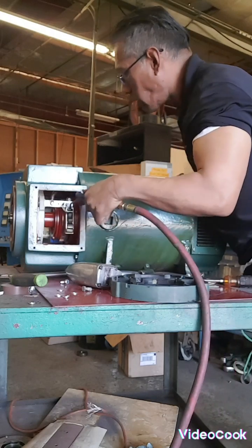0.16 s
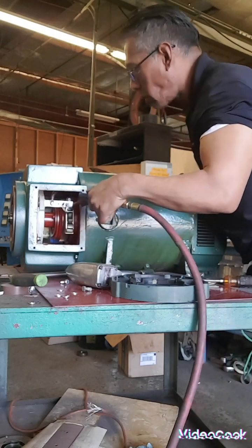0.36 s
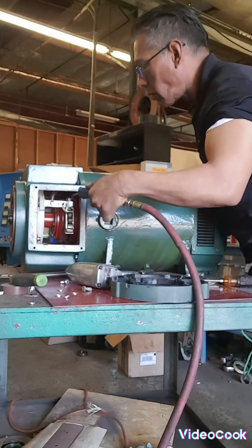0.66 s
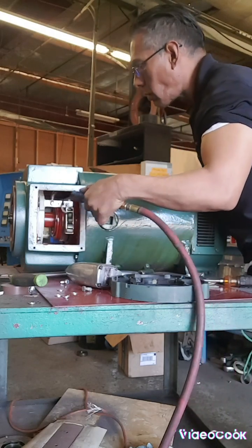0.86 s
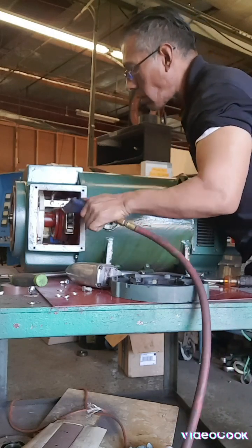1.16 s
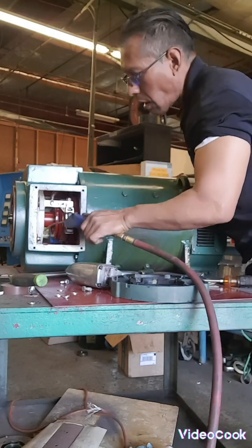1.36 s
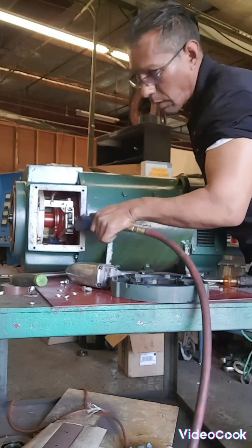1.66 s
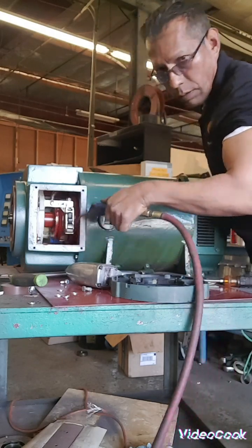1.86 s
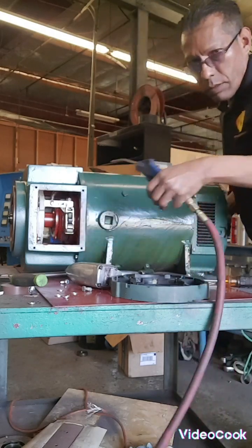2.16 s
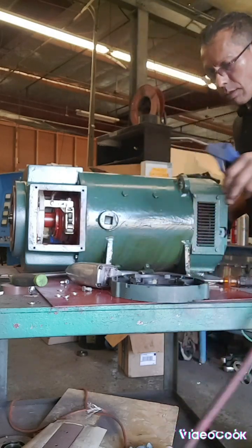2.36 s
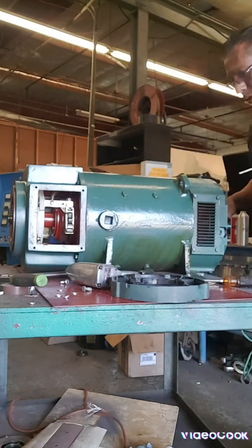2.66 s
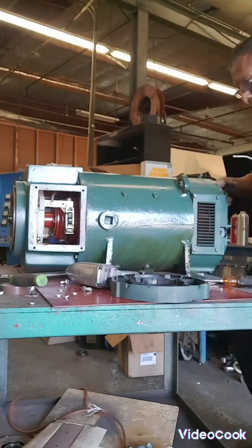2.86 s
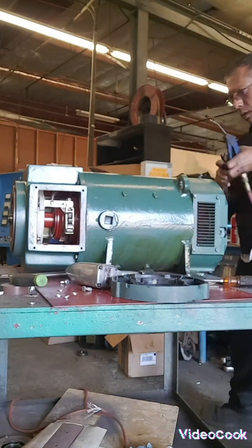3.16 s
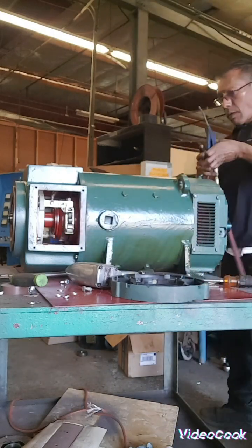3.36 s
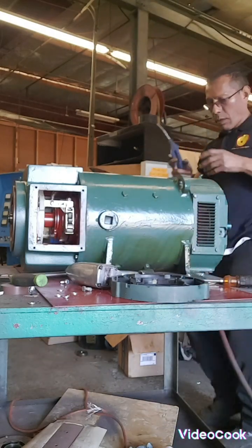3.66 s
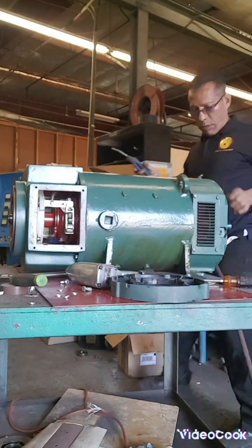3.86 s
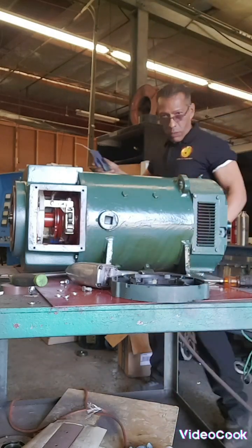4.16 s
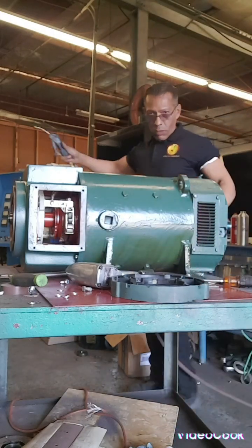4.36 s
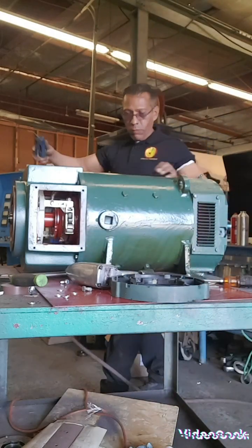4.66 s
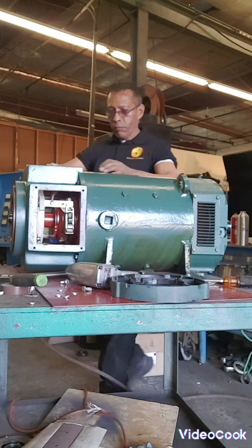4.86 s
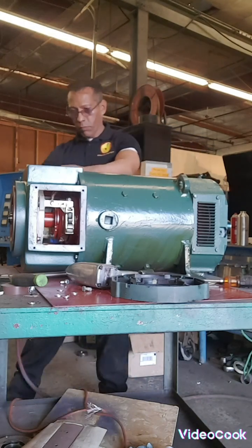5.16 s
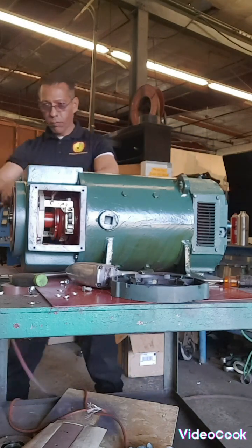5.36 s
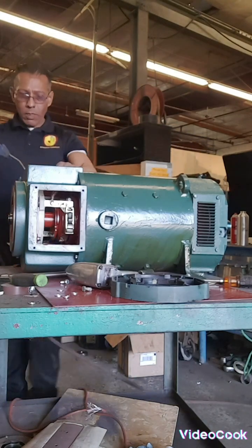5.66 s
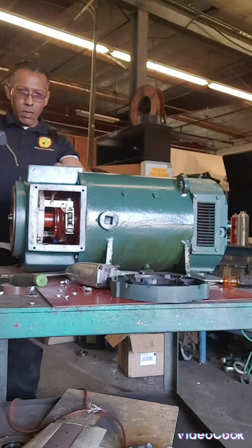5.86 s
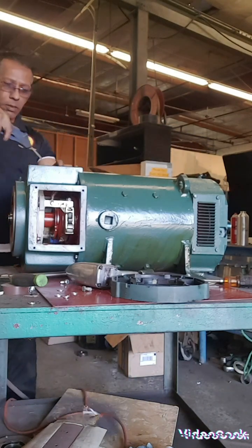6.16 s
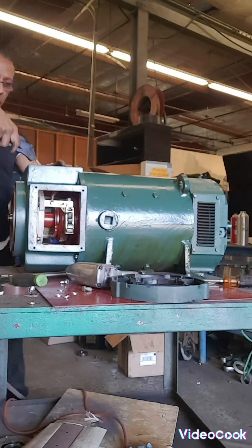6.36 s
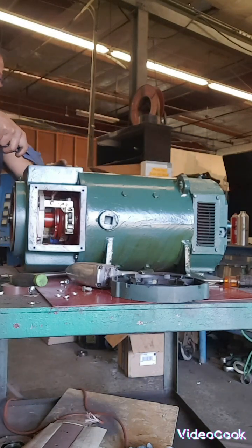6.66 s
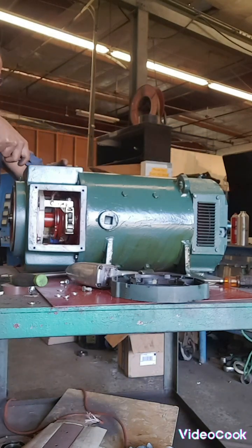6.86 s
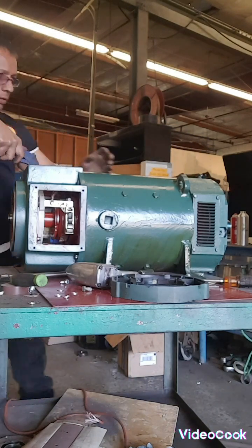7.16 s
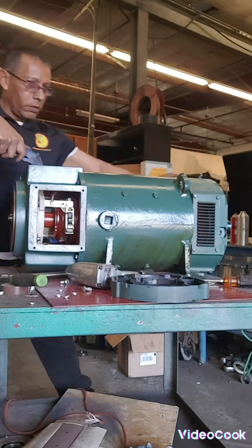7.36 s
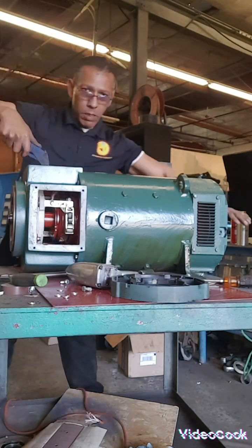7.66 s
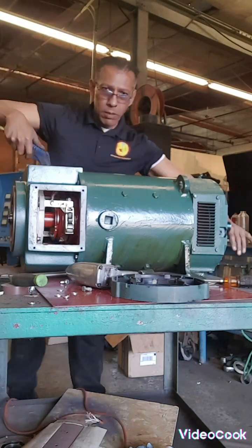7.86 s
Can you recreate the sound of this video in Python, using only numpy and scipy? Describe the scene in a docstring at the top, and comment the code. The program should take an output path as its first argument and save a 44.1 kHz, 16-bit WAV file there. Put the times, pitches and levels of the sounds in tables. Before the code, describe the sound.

Two long blasts of compressed air hiss against a metal motor in a workshop, with low puffs, a briefly chattering valve and an electrical hum.

```python
"""An air blow gun cleans a large electric motor in a repair hall, in two long bursts and a few faint spits of air.
The jet hisses, splashes on the casing and sounds its cavities; deflected air puffs over the microphone.
During the second burst something in the air line, probably a valve, chatters. A machine hums in the hall."""
import sys
import numpy as np
from scipy import signal
from scipy.fft import rfft, irfft, next_fast_len
from scipy.io import wavfile
from scipy.ndimage import uniform_filter1d, map_coordinates

SR = 44100
rng = np.random.default_rng(int(sys.argv[2]) if len(sys.argv) > 2 else 0)


def master_out(mix):
    """Clip the mix to full scale and print it as 16-bit PCM to the path in sys.argv[1]."""
    frames = np.transpose(np.atleast_2d(mix))
    ceiling = np.clip(frames, -1, 1)
    pcm = np.round(ceiling * 32767).astype(np.int16)
    wavfile.write(sys.argv[1], SR, pcm)


N = 352800

# the valve's strength: (s, level dB)
CHATTER = [(4.21, -26), (4.28, -20.5), (4.42, -20.5), (4.55, -21.5), (4.98, -20.5), (5.12, -28.5), (6.36, -30.5)]
VALVE_OPENS, VALVE_RESTS = 4.217, 6.36  # (s)  # fixed
# gusts over the microphone: (s, level dB, length s, flutter trim dB)
PUFFS = [(0.081, -22.5, .02, -10), (0.162, -17, 0.035, -1), (0.353, -31, 0.021, 1), (0.541, -30, 0.024, 12),
         (0.576, -26, 0.044, 3.5), (0.629, -22.5, 0.048, -1.5), (0.745, -26.5, 0.054, 7), (0.806, -22.5, 0.04, 2),
         (0.852, -21.5, 0.045, 0.5), (0.945, -19.5, 0.016, -3), (1.163, -25.5, 0.036, -3), (1.935, -24, 0.042, 3),
         (5.89, -24, 0.029, -12), (6.621, -29, 0.081, 9), (6.728, -23.5, 0.048, 0), (6.85, -27.5, 0.025, 1.5),
         (7.028, -32.5, .035, 10), (7.075, -26, 0.021, 4)]
# brief spits of air as the gun and hose are handled: (s, level dB, length s)
SPITS = [(2.327, -47, 0.13), (2.387, -55, 0.095), (2.555, -55, .02), (2.705, -52.5, 0.09), (2.953, -50, 0.063),
         (3.31, -56, .05), (3.507, -46.5, .05), (3.535, -38.5, 0.15), (4.123, -46.5, 0.099)]
# shoes scuff the floor: (s, level dB, length s)
SCUFFS = [(2.676, -53, .026), (3.344, -43, 0.058)]
# (Hz, dB per Hz)
FIZZ = [(7000, -21), (9600, -17), (10600, -10), (12400, -0.5), (14000, -2), (15200, 4.5), (16000, -17)]
HISS = [(1500, -9), (3000, -6.5), (4400, -1.5), (5600, 0), (7000, -1.5), (8100, 1), (8900, -5), (9600, -10), (10800, -10), (14000, -12)]
SPLASH = [(300, -20), (750, -6), (1100, -.5), (1700, 0), (2500, -2.5), (3200, -4.5), (4500, -9), (9000, -28)]  # fixed
SLAP = [(30, -30), (90, -11), (170, -7), (350, -1), (600, -1), (800, 0), (1000, -4), (1250, -8), (1470, -24), (2400, -48)]  # fixed
THUMP = [(20, -26), (50, -2.5), (110, -2.5), (200, -11), (400, -10), (1500, -39)]
FLUTTER = [(80, -26), (200, -3), (400, 1.5), (700, -1), (1500, -15), (4000, -26), (10000, -41)]
CRACK = [(150, 2), (400, 2), (1200, -3), (2500, -6), (4500, -9), (7000, -19), (14000, -37)]  # fixed
SPIT = [(500, -8), (1500, -1.5), (3500, 2), (5500, -5.5), (8000, -11.5), (9600, -21), (13000, -17), (16000, -24)]
MACHINERY = [(30, -22), (70, 4), (170, -7.5), (320, -0.5), (600, -2.5), (1000, -5), (1500, -14), (3000, -16), (8000, -30.5)]
LEAK = [(500, -20), (1500, -13), (4000, -4), (8000, -3), (9600, -18), (12000, -1), (14000, 3.5), (16000, 2.5)]
CAVITY = [(330.3, 33, 2), (503, 41, 0), (610, 740, -7.5), (986, 22, 3.5)]  # (Hz, width Hz, dB)
BUZZ = [(1, -11.5), (2, 0.5), (3, -12), (4, -5), (5, -1.5), (6, -3), (7, -4.5), (8, -6.5), (9, -1), (10, -17.5), (11, -7.5),
        (12, -8), (13, -9.5), (14, -2.5), (15, -8), (16, -8), (17, -7.5), (18, -10), (19, -15)]  # (multiple of the beat, dB)
# the hum's partials: (Hz, dB)
HUM = [(70, 0), (140, -4), (210, -19), (280, -9), (350, -7), (420, -15), (490, -16), (560, -16), (630, -18)]  # fixed
ALIKE = [(60, 0.93), (400, 0.95), (1000, 0.52), (2500, 0.35), (7000, 0.33), (15000, 0.24)]  # (Hz, left-right likeness)
ROOM = [(100, .5), (500, .7), (1300, .7), (2000, 1.19), (3700, 1.05), (5500, 0.81), (8000, 0.52), (12000, 0.37), (16000, 0.26)]  # (Hz, t60 s)  # fixed
TOP_HZ = 15830  # fixed
VENT = [(976, 17, -3), (1760, 36, -7)]  # (Hz, width Hz, dB)
# the jet catches an edge and sings for a moment: (s, level dB, length s, centre Hz)
EDGES = [(0.187, -28.5, 0.39, 4580), (0.207, -29.5, 0.4, 5900), (0.862, -32, 0.056, 3350), (0.961, -23, 0.032, 4700), (6.768, -18, 0.1, 4800),
         (7.14, -30, .13, 3620)]
# how squarely the nozzle faces the microphone in each burst: (s, jet level dB)
FACING_FRONT = [(0.0, -33.5), (0.072, -25), (0.082, -30), (0.388, -27.5), (0.432, -28.5), (0.598, -25), (1.092, -28),
                (1.546, -32), (1.556, -26), (1.718, -34.5), (1.844, -30), (1.884, -30), (1.966, -21), (1.99, -27)]
FACING_BEHIND = [(4.26, -36.5), (4.29, -43), (4.85, -45.5), (4.98, -27), (5.31, -23.5), (5.53, -30), (5.96, -21.5),
                 (6.05, -29), (6.54, -26), (6.59, -30), (6.64, -24), (6.85, -25), (6.89, -31.5), (7.28, -28),
                 (7.45, -30), (8.0, -27.5)]
USUAL_JET_DB, FIZZ_DB = -28, 5  # jet level at the usual facing; fizz over the jet level
HISS_FOLLOWS, SPLASH_FOLLOWS = 0.52, 0.53  # dB per dB of facing: lower sound is less beamed
# the jet sweeps over a rib or a winding: (s, length s, splash dB, hiss dB)
STRIKES = [(0.152, 0.017, -24, -29), (0.521, 0.044, -28, -46), (0.594, 0.082, -27, -29), (0.727, 0.065, -24.5, -29),
           (0.837, 0.038, -19.5, -40), (0.951, 0.05, -22, -23.5), (1.263, 0.05, -51, -27),
           (1.545, 0.089, -31.5, -35.5), (1.811, 0.077, -32.5, -51), (1.925, 0.074, -31, -18.5), (4.261, 0.18, -34, -30.5),
           (4.444, 0.75, -31, -36), (5.088, 0.084, -24, -37), (5.152, 0.061, -20.5, -23), (5.267, 0.036, -25, -19.5),
           (5.34, 0.3, -32, -42), (5.594, 0.056, -31, -28.5), (5.984, 0.13, -27, -26.5), (6.126, 0.19, -31.5, -27.5),
           (6.418, 0.086, -26.5, -22.5), (6.518, 0.062, -26, -20), (6.61, 0.13, -33, -21), (6.94, 0.048, -34, -39), (7.037, 0.043, -27.5, -30),
           (7.128, 0.096, -31.5, -26), (7.225, 0.18, -56, -26.5), (7.407, 0.11, -30.5, -37), (7.524, 0.25, -54, -27.5),
           (7.778, 0.12, -27.5, -28)]
STRIKE_RISE_S, STRIKE_FALL_S = .02, .015  # fixed
# the jet blows straight into an opening of the motor: (s, length s, cavity dB)
OPENINGS = [(0.01, 0.049, -35.5), (1.007, 0.15, -38.5), (1.24, 0.27, -54), (1.67, 0.18, -39.5), (1.948, 0.064, -41.5), (4.292, .19, -27),
            (4.995, 0.76, -34.5), (6.173, 0.24, -29.5), (6.473, 0.054, -28), (7.148, 0.18, -39.5), (7.726, 0.35, -39)]
OPENING_RISE_S, OPENING_FALL_S = 0.027, 0.052
CAVITY_DB = -18  # elsewhere the cavities sound this far under the splash  # fixed
# the valve starts slowly, beats steadily, then sags a little: (s, beats a second)
BEAT = [(4.216, 49.3), (4.26, 52.9), (4.36, 53.4), (4.42, 52.65), (4.75, 52.65), (4.85, 52.1), (5.1, 52.4), (5.7, 52), (6.3, 52.3)]  # fixed
# its knocks stand out at first and sink into the buzz later: (s, level dB)
KNOCK_LEVEL = [(4.216, -34), (4.25, -26.5), (4.275, -25.5), (4.43, -27), (4.55, -32), (4.92, -33), (5.12, -42), (6.36, -45)]  # fixed
KNOCK = [(150, 0), (1150, 0), (1350, -7), (1500, -16), (1800, -34), (3000, -70)]  # a dull knock: (Hz, dB per Hz)  # fixed
KNOCK_RING = [(370, 130, 3), (720, 220, 0), (1080, 350, -4)]  # the valve body: (Hz, width Hz, dB)  # fixed
KNOCK_JITTER_S = .0002  # fixed
KNOCK_TRAIL_S, KNOCK_FRONT_HZ = .004, 1200  # a knock's bass trails behind its front  # fixed
KNOCK_SCATTER_DB, REBOUND, REBOUND_S = 1.2, .35, .006  # beat to beat; strength and delay of the rebound  # fixed
GUST_DB = -4  # the air that escapes with each beat  # fixed
# the jet crosses a slot between windings or fins: (s, length s, level dB, centre Hz)
SLOTS = [(0.602, 0.21, -36, 2400), (1.042, 0.11, -37.5, 1580), (1.544, .1, -37.5, 1660), (6.527, 0.04, -29, 2420),
         (7.14, 0.069, -33.5, 2100), (7.41, .1, -31, 2370)]
SLOT_WIDTH_HZ = 560  # fixed
# a machine in the hall runs up
RUN_UP_AT = 3.29  # fixed
SPUTTER_DB, SPUTTERS_PER_S = 0.5, 98  # a gust is lumpy
# the trigger is held: (opens s, closes s, time to open fully s)
TRIGGER = [(-1, 1.997, .03), (4.205, 9, .06)]  # fixed
# each burst at the usual facing: (hiss dB, splash dB)
BURST_LEVELS = [(-27.5, -38.5), (-28, -35.5)]
MURMUR_IDLE_DB, MURMUR_RUNNING_DB, MURMUR_RISE_S = -52, -41, 0.47
LEAK_OPENS = 3.5  # (s)  # fixed
LEAK_IDLE_DB, LEAK_RUNNING_DB = -58.5, -53.5  # a thin leak grows with the machine
LEAK_DB = -52  # and widens when the hose is moved
GLANCE = 0.63  # strength of the casing's reflections beside the direct hiss
HUM_JITTER = .4  # phase unrest of its lowest partial (radians)  # fixed
RUMBLE_SWAY_DB, HUM_SWAY_DB = 3.5, 1.6  # both waver in level  # fixed
# the jet points past the motor and rushes less: (s, length s, splash dB, hiss dB)
LULLS = [(0.335, 0.14, -5, 1.5), (0.893, 0.048, -6, 5), (1.027, 0.51, 0, -2), (6.869, 0.083, -16, -3), (6.99, 0.025, -12, -4),
         (7.09, .03, -12, 0.5), (7.56, 0.12, -1.5, -.5)]
PUFF_RISE_S, PUFF_FALL_S = .003, .009  # fixed
CLOSE_S = .012  # the trigger valve shuts  # fixed
# the hardest gusts crack as they hit: (s, level dB)
CRACKS = [(0.168, -17), (0.184, -21.5), (0.545, -21), (0.641, -24), (0.751, -22), (0.768, -25), (0.862, -21), (7.079, -21.5)]
CRACK_S = .004  # fixed
# the jet crosses a small hole, which hoots or whistles: (s, level dB, length s, first Hz, last Hz)
HOOTS = [(0.168, -27, 0.022, 380, 286), (0.413, -41, .07, 1720, 1760), (0.542, -29, 0.016, 383, 302), (0.657, -37, .045, 1740, 1730),
         (0.752, -25, 0.0287, 515, 279), (0.827, -33, 0.018, 200.5, 330), (0.953, -34, 0.012, 169, 219)]
HOOT_WIDTH_HZ = 64
BODY = [(200, -4.5), (320, 2.5), (600, -5), (900, -3.5), (1800, -17), (4000, -50)]  # the jet's low rush: (Hz, dB per Hz)
BODY_DB = -46.5
HOLLOW_WANDER, WANDERS_PER_S = .03, 8  # share by which the hollows' pitch shifts with the nozzle  # fixed
# the hum swells and sways as the machine runs up: (s, level dB)
HUM_LEVEL = [(3.3, -57), (3.46, -44), (3.67, -37.5), (3.82, -42), (3.98, -37), (4.12, -35.5), (4.19, -42), (4.3, -39)]  # fixed
PIPE, PIPE_DB = [(748, 20, 0)], -14  # the air line rings with each beat: (Hz, width Hz, dB); its level
BUZZ_JITTER = .075  # phase unrest per multiple (radians)  # fixed


def amp(db):
    """Decibels to gain."""
    return 10 ** (np.asarray(db) / 20)


def unit(x):
    """Scale to rms 1."""
    return x / np.sqrt(np.mean(x ** 2) + 1e-20)


def clock():
    """The time of every sample."""
    return np.arange(N) / SR


def along(points, hz):
    """Read (Hz, value) points on a log axis."""
    f, v = np.transpose(points)
    return np.interp(np.log(hz + 1), np.log(f + 1), v)


def curves(rows):
    """One value per sample for each column after the time."""
    s, *cols = np.transpose(rows)
    return [np.interp(clock(), s, c) for c in cols]


def gate(start, end, rise, fall):
    """Open from start to end, with soft edges."""
    return np.clip((clock() - start) / rise, 0, 1) * np.exp(-np.maximum(clock() - end, 0) / fall)


def swell(start, length):
    """A quick rise to 1 and a slower fall."""
    u = np.maximum(clock() - start, 0) / max(length / 4, .002)
    return u * np.exp(1 - u)


def wobble(rate):
    """A smooth random curve, rate knots a second."""
    knots = rng.standard_normal(int(N * rate / SR) + 4)
    coarse = clock()[::64]  # fixed
    return np.interp(clock(), coarse, map_coordinates(knots, [coarse * rate]))


def filtered(x, response):
    """x times a response of frequency."""
    m = next_fast_len(N + SR // 4, True)
    return irfft(rfft(x, m) * response(np.fft.rfftfreq(m, 1 / SR)), m)[..., :N]


def colour(points):
    """The response of a spectrum, falling away below its first point."""
    return lambda hz: amp(along(points, hz)) * np.minimum(hz / points[0][0], 1) ** 2


def eddies(patchy_db):
    """Two white noises whose strength drifts in patches of time and pitch."""
    z = signal.stft(rng.standard_normal((2, N)), nperseg=512)[2]
    field = rng.standard_normal(z.shape[1:])
    field = uniform_filter1d(uniform_filter1d(field, size=6, axis=0), size=18, axis=1)
    return signal.istft(z * amp(patchy_db * unit(field)), nperseg=512)[1][:, :N]


def at_ports(pair, response, lead_ms=0):
    """Colour two signals and share them between the microphone ports; the left one may lead."""
    turn = lambda hz: np.arccos(np.clip(along(ALIKE, hz), -1, 1)) / 2
    mid, side = filtered(pair, lambda hz: response(hz) * np.array([np.cos(turn(hz)), np.sin(turn(hz))]))
    left = filtered(mid + side, lambda hz: np.exp(2j * np.pi * hz * lead_ms / 1000)) if lead_ms else mid + side  # fixed
    return unit(np.array([left, mid - side]))


def rush(spectrum):
    """Smooth stereo noise of rms 1."""
    return at_ports(rng.standard_normal((2, N)), colour(spectrum))




def blow_gun(fizz_gain, hiss_gain, splash_gain):
    """Nozzle fizz and jet hiss; where the jet strikes, it splashes."""
    unrest = wobble(40)  # the jet flicks over edges and windings
    fizz = fizz_gain * amp(1.13 * unrest) * at_ports(eddies(patchy_db=2.0), colour(FIZZ), lead_ms=0.044)
    hiss = hiss_gain * amp(1.0 * unrest) * at_ports(eddies(patchy_db=1.9), colour(HISS), lead_ms=0.039)
    splash = splash_gain * amp(0.23 * unrest + 0.77 * wobble(45)) * at_ports(eddies(patchy_db=2.5), colour(SPLASH), lead_ms=0.038)
    return fizz + hiss + splash + edges()


def valve():
    """Each beat knocks sharply, rebounds and lets out a slap of air; the steady beating builds up a buzz in the hall."""
    level_db, = curves(CHATTER)
    beat_hz, = curves(BEAT)
    knock_db, = curves(KNOCK_LEVEL)
    turns = np.cumsum(beat_hz * (clock() > VALVE_OPENS)) / SR
    uneven = turns + (turns > .5) * beat_hz * KNOCK_JITTER_S * wobble(50)
    beats = np.diff(np.ceil(uneven), prepend=0) * amp(KNOCK_SCATTER_DB * wobble(50))
    beats = beats + REBOUND * np.roll(beats, round(REBOUND_S * SR))
    trailing = lambda hz: np.exp(-2j * np.pi * KNOCK_TRAIL_S * (hz - hz ** 2 / (2 * KNOCK_FRONT_HZ)))
    knocks = amp(knock_db) * unit(filtered(beats, lambda hz: colour(KNOCK)(hz) * resonances(KNOCK_RING)(hz) * trailing(hz)))
    escaping = (np.exp(-(turns % 1) / beat_hz / 0.01) + 0.17) * rng.standard_normal((2, N))
    gusts, ring = at_ports(escaping, colour(SLAP)), at_ports(escaping, resonances(PIPE))
    buzz = np.zeros((2, N))
    for k, db in BUZZ:
        phase = rng.uniform(0, 2 * np.pi) + rng.normal(0, 0.11, (2, 1)) + BUZZ_JITTER * k * wobble(22)
        buzz += amp(db + 2.7 * wobble(7)) * np.sin(2 * np.pi * k * turns + phase)
    slaps = amp(level_db) * (amp(GUST_DB) * gusts + amp(PIPE_DB) * ring)
    buzz = buzz / np.std(buzz[:, clock() > VALVE_OPENS])
    buzzing = amp(level_db - 3.0) * gate(VALVE_OPENS, 6.28, 0.039, 0.11) * buzz
    return gate(VALVE_OPENS - .002, VALVE_RESTS, 0.0011, 0.082) * (knocks + slaps) + buzzing


def puffs():
    """Deflected air thumps and flutters at each port separately; the hardest gusts crack."""
    thump = sum(amp(db) * held(s, length, PUFF_RISE_S, PUFF_FALL_S) for s, db, length, flutter_db in PUFFS)
    flutter = sum(amp(db + flutter_db) * held(s, length, PUFF_RISE_S, PUFF_FALL_S) for s, db, length, flutter_db in PUFFS)
    draught = amp(-46.5) * gate(-1, 1.17, .01, 0.11)
    buffet = unit(filtered(rng.standard_normal((2, N)), colour(THUMP)))
    sputter = amp(SPUTTER_DB * wobble(SPUTTERS_PER_S))
    cracks = sum(amp(db) * swell(s, CRACK_S) for s, db in CRACKS) * rush(CRACK)
    return sputter * ((amp(-7.5) * thump + draught) * buffet + amp(-13.0) * flutter * rush(FLUTTER)) + cracks


def handling():
    """Small spits of air and scuffing shoes between the bursts."""
    spits = sum(amp(db) * swell(s, length) for s, db, length in SPITS)
    scuffs = sum(amp(db) * swell(s, length) for s, db, length in SCUFFS)
    return spits * rush(SPIT) + scuffs * rush(FLUTTER)


def hall():
    """An electrical hum and distant machinery swell before the second burst; a thin leak of air sets in."""
    hum_db, = curves(HUM_LEVEL)
    machinery_db = run_up(MURMUR_IDLE_DB, MURMUR_RUNNING_DB, MURMUR_RISE_S)
    hum = np.zeros((2, N))
    for hz, db in HUM:
        phase = rng.uniform(0, 2 * np.pi) + rng.normal(0, 0.14, (2, 1)) + HUM_JITTER * np.sqrt(hz / HUM[0][0]) * wobble(18)
        hum += amp(db + HUM_SWAY_DB * wobble(10.0)) * np.sin(2 * np.pi * hz * clock() + phase)
    rumble = amp(hum_db - 6.0 + RUMBLE_SWAY_DB * wobble(14)) * rush(THUMP)
    machinery = amp(machinery_db) * rush(MACHINERY)
    leak = (amp(run_up(LEAK_IDLE_DB, LEAK_RUNNING_DB, MURMUR_RISE_S)) + amp(LEAK_DB) * gate(LEAK_OPENS, 5.4, 0.011, .1)) * rush(LEAK)
    fade = amp(np.interp(clock(), [4.3, 6.9], [0, -20]))
    return fade * (amp(hum_db - 0.5) * unit(hum) + rumble + machinery + leak)


def reverb(x):
    """The hall's answer, new for each place of the nozzle: the middle range rings longest."""
    wet, step = np.zeros((2, N + 2 * SR)), SR // 4  # fixed
    for start in range(0, N, step):
        hz, t, z = signal.stft(rng.standard_normal((2, SR)), SR, nperseg=256)
        tail = signal.istft(z * amp(-60 * t / along(ROOM, hz)[:, None]), SR, nperseg=256)[1]
        answer = signal.fftconvolve(x[:, start:start + step], tail / np.linalg.norm(tail[0]), axes=1)
        wet[:, start:start + answer.shape[1]] += answer
    return wet[:, :N]


def resonances(modes):
    """The response of a hollow with these modes."""
    return lambda f: sum((-1) ** k * amp(db) * 1j * f * w / (c * c - f * f + 1j * f * w) for k, (c, w, db) in enumerate(modes)) / (1 + (f / 1500) ** 2)


def edges():
    """Each edge gives a hiss about an octave wide."""
    band = lambda hz: rush([(hz / 8, -45), (hz / 1.6, -14), (hz, 0), (hz * 1.5, -14), (hz * 3, -35)])  # fixed
    return sum(amp(db) * swell(s, length) * band(hz) for s, db, length, hz in EDGES)


def held(start, length, rise, fall):
    """A soft-edged hold of the given length."""
    return gate(start, start + length, rise, fall)


def jet_levels():
    """Strength of fizz, hiss and splash: the nozzle's facing sets all three, and strikes add hiss and splash."""
    fizz = hiss = splash = 0
    for (opens, closes, rise), (hiss_db, splash_db), facing in zip(TRIGGER, BURST_LEVELS, (FACING_FRONT, FACING_BEHIND)):
        jet_db, = curves(facing)
        trigger = gate(opens, closes, rise, CLOSE_S)
        fizz = fizz + trigger * amp(jet_db + FIZZ_DB)
        hiss = hiss + trigger * amp(hiss_db + HISS_FOLLOWS * (jet_db - USUAL_JET_DB))
        splash = splash + trigger * amp(splash_db + SPLASH_FOLLOWS * (jet_db - USUAL_JET_DB))
    hiss_power, splash_power = hiss ** 2, splash ** 2
    for s, length, splash_db, hiss_db in STRIKES:
        contact = held(s, length, STRIKE_RISE_S, STRIKE_FALL_S) ** 2
        hiss_power = hiss_power + contact * amp(hiss_db) ** 2
        splash_power = splash_power + contact * amp(splash_db) ** 2
    for s, length, splash_db, hiss_db in LULLS:
        away = held(s, length, STRIKE_RISE_S, STRIKE_FALL_S)
        hiss_power = hiss_power * amp(hiss_db * away) ** 2
        splash_power = splash_power * amp(splash_db * away) ** 2
    return fizz, np.sqrt(hiss_power), np.sqrt(splash_power)


def run_up(idle_db, running_db, seconds):
    """A level in dB that climbs from idle to running."""
    return idle_db + (running_db - idle_db) * np.clip((clock() - RUN_UP_AT) / seconds, 0, 1)


def glance(pair):
    """Reflections off the casing carve fine ripples, different at each port, that shift as the nozzle moves."""
    z = signal.stft(pair, nperseg=1024)[2]
    field = rng.standard_normal((2,) + z.shape)
    real, imaginary = uniform_filter1d(uniform_filter1d(field, size=3, axis=2), size=14, axis=3)
    ripple = 1 + GLANCE * (unit(real) + 1j * unit(imaginary)) / np.sqrt(2)
    return signal.istft(z * ripple, nperseg=1024)[1][:, :N] / np.hypot(1, GLANCE)


def wander(pair):
    """Let the pitch of a resonance drift as the nozzle moves."""
    bent = clock() + np.cumsum(HOLLOW_WANDER * wobble(WANDERS_PER_S)) / SR
    return np.array([np.interp(bent, clock(), x, period=None) for x in pair])


def hollows(splash_gain):
    """The motor's cavities sound under the jet, over a low rush."""
    blown_in = sum(amp(db) * held(s, length, OPENING_RISE_S, OPENING_FALL_S) for s, length, db in OPENINGS)
    cavity_gain = np.hypot(blown_in, amp(CAVITY_DB) * splash_gain)
    cavity = cavity_gain * amp(1.5 * wobble(26)) * wander(at_ports(eddies(patchy_db=3.5), resonances(CAVITY)))
    far_end = gate(5.7, 9, 0.34, .1)  # at the far end the jet blows across another opening
    vent = far_end * splash_gain * amp(-12.0 + 2.4 * wobble(19)) * wander(at_ports(rng.standard_normal((2, N)), resonances(VENT)))
    blowing = sum(gate(opens, closes, rise, CLOSE_S) for opens, closes, rise in TRIGGER)
    return cavity + vent + blowing * amp(BODY_DB + 3.3 * wobble(30)) * rush(BODY)


def hoots():
    """Narrow noise that glides as the jet passes over a hole."""
    out = np.zeros(N)
    for s, db, length, first_hz, last_hz in HOOTS:
        phase = 2 * np.pi * np.cumsum(np.interp(clock(), [s, s + length], [first_hz, last_hz])) / SR
        out += amp(db) * held(s, length, PUFF_RISE_S, PUFF_FALL_S) * np.sin(phase + wobble(HOOT_WIDTH_HZ))
    return out * amp(1.8 * wobble(HOOT_WIDTH_HZ))


def slots():
    """The jet blows across a narrow slot, which rings with a breathy pitch."""
    band = lambda hz: at_ports(rng.standard_normal((2, N)), lambda f: resonances([(hz, SLOT_WIDTH_HZ, 0)])(f) ** 2)
    return wander(sum(amp(db) * held(s, length, STRIKE_RISE_S, STRIKE_FALL_S) * band(hz) for s, length, db, hz in SLOTS))


def scene():
    """All sources in the hall, a little to the right; only the direct hiss is rippled by the casing."""
    fizz_gain, hiss_gain, splash_gain = jet_levels()
    jet = blow_gun(fizz_gain, hiss_gain, splash_gain)
    others = hollows(splash_gain) + slots() + valve() + handling()
    near = glance(jet) + others + puffs() + hoots()
    return (near + amp(-10.5) * reverb(jet + others)) * amp([[-.9], [.9]]) + hall() * amp([[-1.4], [1.4]])


def record(dry):
    """The phone keeps nothing above its band limit."""
    return filtered(dry, lambda hz: hz < TOP_HZ)


dry = scene()
out = record(dry)
master_out(out)
```